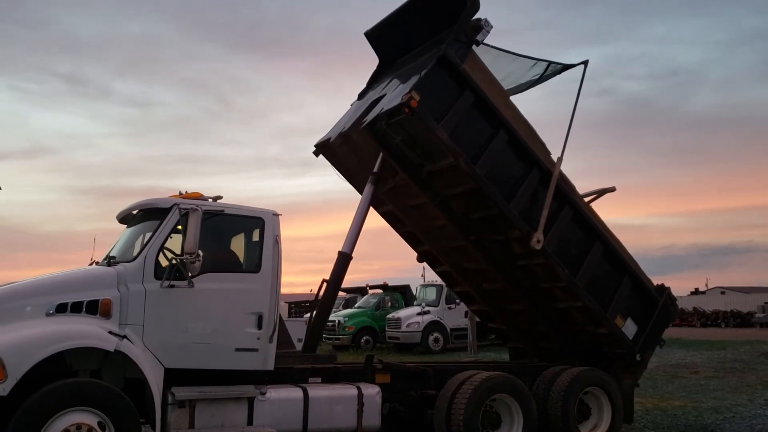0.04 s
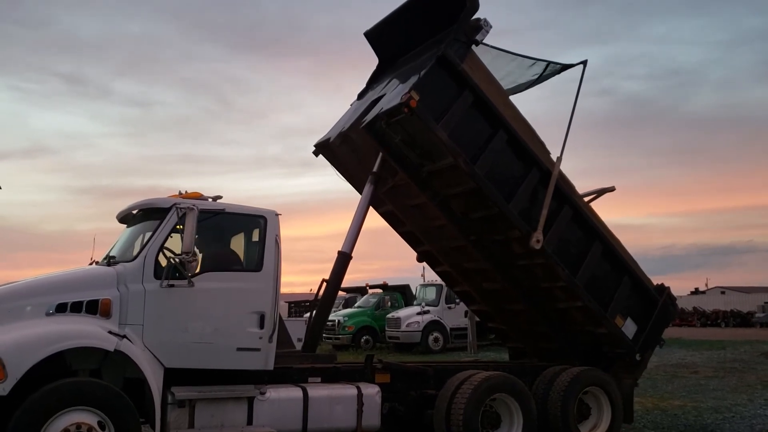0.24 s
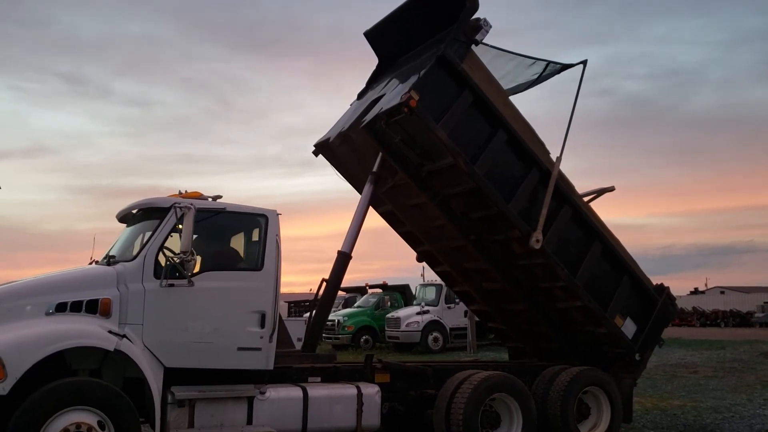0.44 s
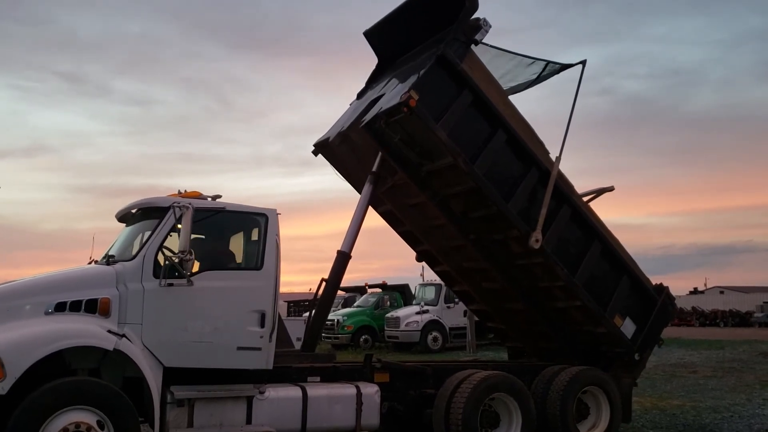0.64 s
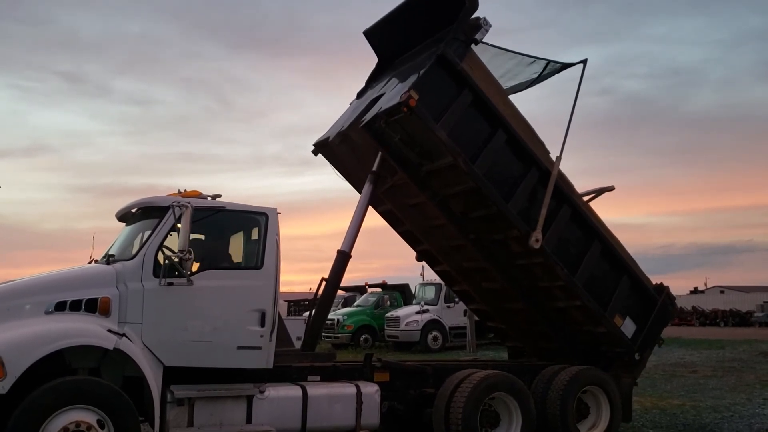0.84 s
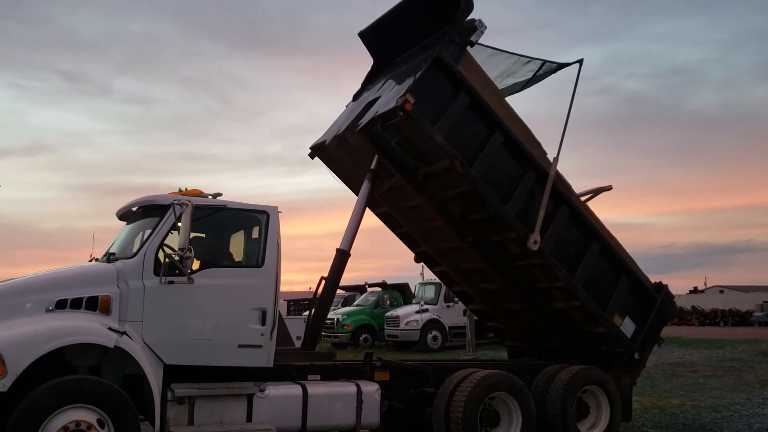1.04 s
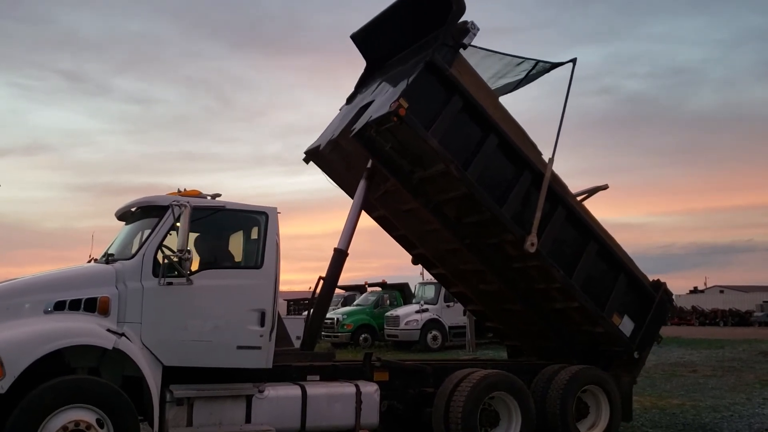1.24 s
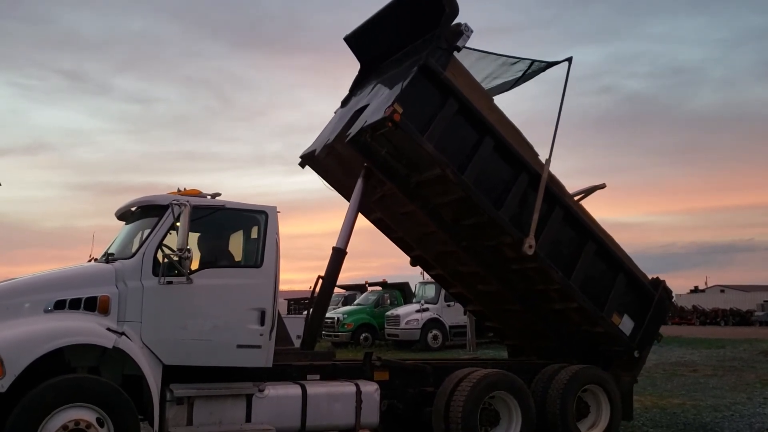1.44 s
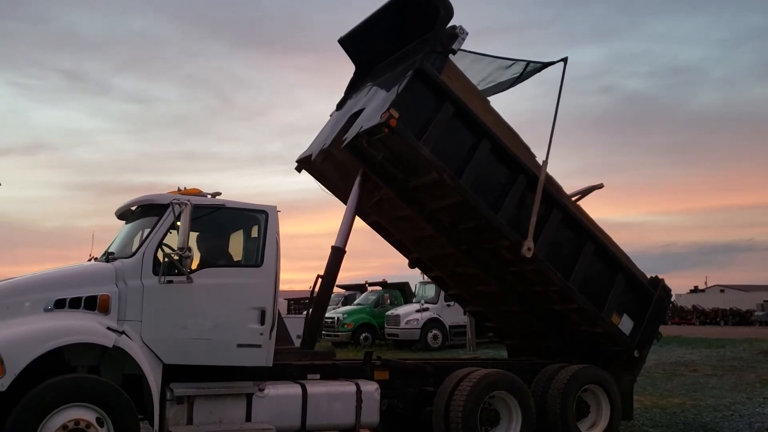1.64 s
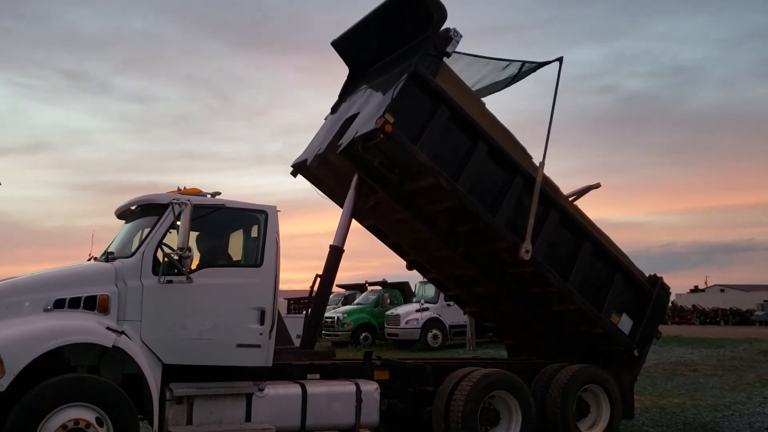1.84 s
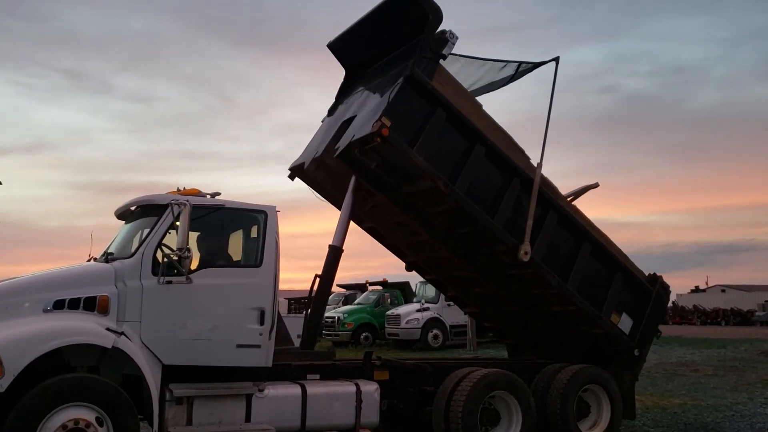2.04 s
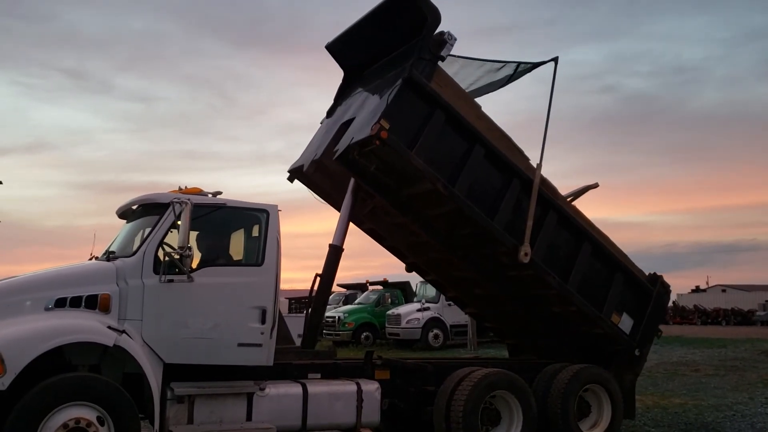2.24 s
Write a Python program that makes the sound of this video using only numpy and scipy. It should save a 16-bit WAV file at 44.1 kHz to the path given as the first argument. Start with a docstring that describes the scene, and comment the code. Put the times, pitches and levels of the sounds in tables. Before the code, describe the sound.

A diesel dump truck idles with a clattering rumble, then its steel bed thumps three times.

```python
"""A six-cylinder diesel dump truck idles outdoors, a few metres away, heard in stereo.
Its exhaust drones and puffs, burning fuel makes the engine clatter, and the fuel injection ticks.
The raised steel bed thumps three times among lighter knocks, with a dull echo from the yard.
An automatic volume control turns the loud moments down quickly and comes back up slowly."""
import sys
import numpy as np
from scipy import signal
from scipy.fft import rfft, irfft, next_fast_len
from scipy.io import wavfile
from scipy.ndimage import uniform_filter1d

SR = 44100
rng = np.random.default_rng(int(sys.argv[2]) if len(sys.argv) > 2 else 0)


def store_wav(level_fs):
    """Save 16-bit WAV to argv[1]."""
    pcm = np.round(np.clip(np.atleast_2d(level_fs), -1, 1) * 32767)
    wavfile.write(sys.argv[1], SR, pcm.T.astype(np.int16))


N = 101429
T, HZ = np.arange(N) / SR, np.fft.rfftfreq(N, 1 / SR)
CRANK_HZ = 11.667  # turns of the engine's crankshaft per second
WAVER_HZ = 34.86  # how fast the ringing steel wavers

# When cylinders fire in one crank turn: (position [share of a turn], relative strength [dB])
FIRINGS = [(.27, -3.5), (.6, -2.5), (.94, -4)]
# How the engine reaches the left and right microphones:
# (frequency [Hz], likeness [0-1], left lead [rad], left minus right [dB])
ENGINE_STEREO = [(60, 0.77, 1.5, -7), (134, 0.83, 1, 1), (287, 0.81, 0.2, 1), (664, 0.94, 1, 1.3),
                 (1290, 0.29, 1.81, 0.5), (2200, 0.44, 1.42, 2.5), (2870, 0.51, 2.5, 3),
                 (4070, 0.52, 2.5, 2.5), (9000, 0, 3, 1.5), (15000, 0, 6.5, 2)]
# The same for the bed: (frequency [Hz], likeness [0-1], left lead [rad], left minus right [dB])
BED_STEREO = [(100, 0.87, 0.5, -1), (248, 0.97, -1.5, 1), (690, 1, -0.5, 2.5), (1370, 0.72, 0.62, 2.5),
              (2800, 0.15, -3.5, 4.5), (10000, 0.1, 0.5, -4)]


def exhaust():
    """The exhaust drones at six times the crank rate, over a rumble that puffs with each firing."""
    # Loudness of the drone: (time [s], level [dB])
    drone_levels = [(0.0, -64), (0.17, -44), (0.25, -30), (0.32, -46), (0.38, -30), (0.42, -41),
                    (0.46, -32), (0.62, -33), (0.66, -61), (0.76, -29), (0.89, -55), (0.95, -34),
                    (1.02, -28.5), (1.08, -40), (1.13, -31.5), (1.28, -33.5), (1.31, -44), (1.43, -28.5),
                    (1.56, -60), (1.6, -31.5), (1.64, -52), (1.71, -48), (1.765, -27), (1.81, -36),
                    (2.0, -35), (2.08, -50), (2.18, -36), (2.22, -30), (2.26, -58)]
    # Weaker exhaust tones: (pitch [multiple of the crank rate], level [dB])
    weak_tones = [(5, -43.5), (10, -45.5), (12, -49)]
    # Tone colour of the rumble: (frequency [Hz], relative level [dB])
    rumble_colour = [(20, -34), (38, 4), (54, -5), (70, 0), (92, 1.5), (125, -0.5), (180, -4), (260, -12.5),
                     (400, -15), (900, -53)]
    # Loudness of the rumble: (time [s], level [dB])
    rumble_levels = [(0, -41.5), (.15, -39), (.27, -31.5), (.45, -38), (.62, -36), (.85, -42), (1.02, -36),
                     (1.3, -35.5), (1.45, -30.5), (1.56, -37), (2.0, -30), (2.3, -40.5)]
    angle = 2 * np.pi * np.cumsum(CRANK_HZ * (1 + 0.0016 * drift(rate_hz=1.2))) / SR
    drone = level(drone_levels) * np.sin(6 * angle + 2 * np.pi * rng.random())
    drone += sum(amp(db) * np.sin(k * angle + 2 * np.pi * rng.random()) for k, db in weak_tones)
    puffs = pulsed(strokes(FIRINGS, decay_s=0.016, spread_db=3.5), share=0.81)
    rumble = level(rumble_levels) * puffs * noise(amp(read(rumble_colour)), ENGINE_STEREO)
    return np.sqrt(2) * drone * amp([[-.5], [.5]]) + rumble


def engine_clatter():
    """Each firing shakes the engine block, which clatters and whines at a few pitches."""
    # Tone colour of the clatter: (frequency [Hz], relative level [dB])
    colour = [(150, -9.5), (320, -4.5), (480, -5.5), (600, -3), (690, -2), (920, -1.5), (1200, -5),
              (1750, -7.5), (2400, -13.5), (3000, -15.5), (4000, -15.5), (5200, -24), (8500, -39.5),
              (16000, -43.5)]
    # Loudness of the clatter: (time [s], level [dB])
    levels = [(0, -31.5), (.3, -31.5), (1.02, -32.5), (1.3, -33.5), (1.6, -32.5), (2.3, -32)]
    # Boost or cut of the clatter around 1670 Hz: (time [s], gain [dB])
    upper_gain = [(0, -1.5), (.45, 0), (.65, -0.5), (1.1, 2.5), (1.4, 0.5), (1.9, -0.5), (2.3, -2.5)]
    # Pitches at which the engine rings: (frequency [Hz], width [Hz], level [dB])
    resonances = [(572, 15, -46.5), (807, 27, -48), (898, 27, -48.5), (1006, 25, -50.5), (2338, 40, -54.5)]
    knocks = pulsed(strokes(FIRINGS, decay_s=0.013, spread_db=2.5), share=0.14)
    grain = unit(amp(drift(rate_hz=200)))
    casing = panel_flicker(noise(amp(read(colour)), ENGINE_STEREO))
    upper = irfft(rfft(casing) * np.exp(-((HZ - 1670) / 1350) ** 2), N)
    clatter = level(levels) * knocks * grain * (casing + (level(upper_gain) - 1) * upper)
    whines = sum(amp(db) * noise(1 / (1 + ((HZ - hz) / width) ** 2), ENGINE_STEREO)
                 for hz, width, db in resonances)
    return clatter + whines


def panel_flicker(sound, flicker_db=2.8, top_hz=5000):
    """Covers and panels ring out by turns, each briefly and in its own narrow range of pitch."""
    hz, _, spectra = signal.stft(sound, SR, nperseg=1024, noverlap=768)
    patches = uniform_filter1d(rng.standard_normal(spectra.shape[1:]), size=3, axis=0)
    patches = unit(uniform_filter1d(patches, size=5, axis=1))
    depth_db = flicker_db / (1 + (hz[:, None] / top_hz) ** 2)
    _, flickering = signal.istft(spectra * amp(depth_db * patches), nperseg=1024, noverlap=768)
    return unit(flickering[:, :N])


def injection():
    """The fuel injection ticks and fizzes three times a turn; now and then a tick is much harder."""
    # Ticks in one crank turn: (position [share of a turn], relative strength [dB])
    pattern = [(.24, 1), (.32, 10), (.62, 0)]
    # The hardest ticks: (time [s], level [dB])
    hard_ticks = [(.275, -41.5), (.363, -39), (.446, -39), (.620, -44), (.704, -43), (.878, -54),
                  (1.046, -43), (1.304, -42), (1.474, -43.5), (1.981, -31.5)]
    # Metallic tone colour of a tick: (frequency [Hz], relative level [dB])
    tick_colour = [(1200, -26), (2800, -16), (3600, 2), (4250, 11.5), (4900, -7), (7000, -23),
                   (9000, -41.5), (15000, -55)]
    # Tone colour of the high fizz: (frequency [Hz], relative level [dB])
    fizz_colour = [(7000, -23), (9500, 1), (10600, 6.5), (11300, 1), (12200, 6), (13300, -6), (16000, -18)]
    regular = amp(-57.5) * strokes(pattern, decay_s=0.003, spread_db=0.5)
    hard = sum(amp(db) * blow(start, rise=0.0096, fade=0.055) for start, db in hard_ticks)
    ticks = np.hypot(regular, hard) * noise(amp(read(tick_colour)), ENGINE_STEREO)
    spurts = strokes([(0.14 + k / 3, 0) for k in range(3)], decay_s=0.017, spread_db=4.0)
    return ticks + amp(-64.5) * spurts * noise(amp(read(fizz_colour)), ENGINE_STEREO)


def truck_bed():
    """The steel bed thumps three times and knocks lightly as it shifts and settles."""
    # Heavy thumps: (time [s], rise [s], boom pitch [Hz], boom level [dB], boom fade [s], thud [dB],
    # ring [dB], crash [dB], crash fade [s], crash cutoff [Hz], rattle [dB], rattle cutoff [Hz],
    # clang pitch [Hz], clang boost [dB])
    thumps = [(1.655, 0.012, 221.5, -12, 0.15, -31, -22.5, -19, 0.24, 2480, -29.5, 6300, 422, 2),
              (1.806, 0.015, 214.7, -19.5, 0.29, -26, -26.5, -18, 0.27, 1650, -26, 4100, 386, 11.5),
              (1.944, 0.0096, 262.1, -7, 0.039, -18, -27, -14.5, 0.18, 2420, -34.5, 3800, 935, 3)]
    # Light knocks: (time [s], panel pitch [Hz], knock level [dB], rattle level [dB])
    knocks = [(1.502, 130, -33, -62), (1.585, 190, -26.5, -51), (1.644, 388.4, -23.5, -37),
              (1.715, 298, -21.5, -66), (1.755, 115, -19.5, -52), (1.981, 116, -19, -38),
              (2.021, 760, -30, -50), (2.05, 257.7, -33, -60), (2.087, 229, -29, -60)]
    return sum(thump(*row) for row in thumps) + sum(light_knock(*row) for row in knocks)


def thump(start, rise, boom_hz, boom_db, boom_fade, thud_db, ring_db, crash_db, crash_fade,
          crash_cutoff_hz, rattle_db, rattle_cutoff_hz, clang_hz, clang_db):
    """The steel crashes and rings, a big panel booms, fittings rattle and the hollow bed rumbles."""
    # The bed's own ringing tones: (frequency [Hz], relative level [dB], fade [s])
    bed_tones = [(124.4, -14, 0.5), (170.2, -1.5, 0.52), (260.8, -3, 0.58), (289.4, -4, 0.7),
                 (342.5, -4.5, 0.76), (390.4, -2, 0.28), (432.7, -2, 0.29), (616, -6, 0.39),
                 (704.6, -5, 0.42), (797, -8, 0.28), (864, -8.5, 0.17), (1084, -6.5, 0.12)]
    # Tone colour of the crashing steel: (frequency [Hz], relative level [dB])
    crash_colour = [(50, -6), (100, 2.5), (250, -8.5), (400, -4.5), (520, -5.5), (800, -1.5), (1000, -9),
                    (1400, -7.5), (2000, -15), (2800, -26), (5500, -36), (9000, -50)]
    # Tone colour of the hollow rumble: (frequency [Hz], relative level [dB])
    hollow_colour = [(100, -19), (190, 6), (270, 12), (380, 3), (480, 9.5), (750, 3), (1300, -25),
                     (5000, -77)]
    # The big panel starts to move just after the hit.
    boom = amp(boom_db) * blow(start + 1.22 * rise, 1.31 * rise, boom_fade) * steel_tone(boom_hz)
    thud = amp(thud_db) * blow(start, rise, fade=0.15) * steel_tone(hz=112.9)
    ring = sum(amp(ring_db + db) * blow(start, rise, fade) * steel_tone(hz)
               * unit(amp(4 * drift(WAVER_HZ))) for hz, db, fade in bed_tones)
    # Each point of contact brings out its own range of pitch.
    clang = clang_db * np.exp(-(np.log2((HZ + 1) / clang_hz) / 0.3) ** 2)
    colour = amp(read(crash_colour) + clang) / np.sqrt(1 + (HZ / crash_cutoff_hz) ** 4)
    steel = noise(colour, BED_STEREO)
    low = irfft(rfft(steel) / (1 + (HZ / 1000) ** 4), N)
    treble = steel - low
    crash = amp(crash_db) * (low * blow(start, rise, crash_fade) + treble * blow(start, rise, fade=0.28))
    hollow = amp(-22.5) * blow(start, rise=0.038, fade=0.34) * noise(amp(read(hollow_colour)), BED_STEREO)
    return boom + thud + ring + crash + hollow + rattle(start, rise * 0.74, rattle_db, rattle_cutoff_hz)


def steel_tone(hz, wobble=0.02486):
    """One ringing tone of the bed, in stereo; the rattling steel bends its pitch a little."""
    sides = np.array([[0.5], [-0.5]])
    phase_gap = np.arccos(np.clip(read(BED_STEREO, hz), 0, 1))
    phase = 2 * np.pi * rng.random() + sides * rng.choice([-1, 1]) * phase_gap
    cycles = np.cumsum(hz * (1 + wobble * drift(WAVER_HZ))) / SR
    return np.sqrt(2) * amp(sides * read(BED_STEREO, hz, column=3)) * np.sin(2 * np.pi * cycles + phase)


def light_knock(start, panel_hz, knock_db, rattle_db, rise=0.0075):
    """One panel rings briefly over a dull thud, and the fittings clink."""
    # Tone colour of the thud: (frequency [Hz], relative level [dB])
    thud_colour = [(40, -24), (100, 0), (280, 1), (450, -10), (800, -28), (2000, -51)]
    body = steel_tone(panel_hz) + amp(-3) * noise(amp(read(thud_colour)), BED_STEREO)
    knock = amp(knock_db) * blow(start, rise, fade=0.07) * body
    return knock + rattle(start, rise, rattle_db, cutoff_hz=3800)


def rattle(start, rise, db, cutoff_hz):
    """Loose fittings on the bed chatter briefly."""
    # Tone colour of the fittings: (frequency [Hz], relative level [dB])
    colour = [(800, -24), (2200, 8.5), (3000, -5), (4100, 1.5), (6000, -8.5), (9000, -17), (15000, -11)]
    softened = amp(read(colour)) / np.sqrt(1 + (HZ / cutoff_hz) ** 4)
    return amp(db) * blow(start, rise, fade=0.15) * noise(softened, BED_STEREO)


def yard_echo(sound, cutoff_hz=600):
    """The yard scatters the sound back as a dull, weak echo."""
    tail = irfft(rfft(rng.standard_normal((2, N))) / (1 + (HZ / cutoff_hz) ** 2), N)
    tail *= blow(start=0.011, rise=0.01, fade=0.7)
    tail /= np.sqrt(np.mean(abs(rfft(tail))[:, HZ < cutoff_hz] ** 2))
    return amp(-13) * signal.fftconvolve(sound, tail, axes=1)[:, :N]


def air_hiss():
    """Air hisses steadily around the engine."""
    # Tone colour of the hiss: (frequency [Hz], relative level [dB])
    colour = [(2000, -14), (7000, 7.5), (9000, -3), (13000, 5), (16000, -13)]
    return amp(-60) * noise(amp(read(colour)), ENGINE_STEREO)


def amp(db):
    """Turns decibels into a number to multiply by."""
    return 10 ** (np.asarray(db) / 20)


def unit(x):
    """Scales a signal to an average strength (rms) of 1."""
    return x / np.sqrt(np.mean(x ** 2) + 1e-20)


def read(table, hz=HZ, column=1):
    """Looks up a table by frequency, blending between rows on a log scale."""
    table = np.array(table, float)
    return np.interp(np.log(hz + 1), np.log(table[:, 0] + 1), table[:, column])


def level(curve):
    """A volume that runs straight between points of (time [s], level [dB])."""
    times, db = np.transpose(curve)
    return np.interp(T, times, amp(db))


def drift(rate_hz):
    """A smooth random wander; a higher rate makes it quicker."""
    size = next_fast_len(N)
    hz = np.fft.rfftfreq(size, 1 / SR)
    return unit(irfft(rfft(rng.standard_normal(size)) * np.exp(-(hz / rate_hz) ** 2), size)[:N])


def noise(colour, stereo):
    """Noise of a given tone colour, as the two microphones hear it."""
    left, other = rfft(rng.standard_normal((2, N)))
    likeness = np.clip(read(stereo), 0, 1)
    balance = amp(read(stereo, column=3) / 2)
    right = (likeness * left + np.sqrt(1 - likeness ** 2) * other) * np.exp(-1j * read(stereo, column=2))
    return unit(irfft(np.array([left * balance, right / balance]) * colour, N))


def strokes(pattern, decay_s, spread_db):
    """The loudness shape of uneven blows that repeat with every crank turn."""
    power = np.zeros(N)
    rise_s = 0.34 * decay_s
    for turn in np.arange(-1, T[-1] * CRANK_HZ):
        for share, db in pattern:
            age = T - (turn + share) / CRANK_HZ
            live = (age > 0) & (age < 10 * decay_s)
            shape = np.exp(-age[live] / decay_s) * (1 - np.exp(-age[live] / rise_s))
            power[live] += (amp(db + spread_db * rng.standard_normal()) * shape) ** 2
    return unit(np.sqrt(power))


def pulsed(pulses, share):
    """Blends a steady level (share 0) with a pulsing one (share 1)."""
    return np.sqrt(1 - share + share * pulses ** 2)


def blow(start, rise, fade):
    """The loudness shape of one hit: it swells for `rise` seconds, then drops 60 dB in `fade` seconds."""
    age = T - start
    swell = np.sin(np.pi / 2 * np.clip(age / rise, 0, 1)) ** 2
    return swell * np.exp(-np.log(1000) * np.maximum(age - rise, 0) / fade)


def scene():
    """The idling engine, and the thumping bed with its echo."""
    hiss = air_hiss()
    bed = truck_bed()
    return exhaust() + engine_clatter() + injection() + hiss + bed + yard_echo(bed)


def record(dry, threshold_db=-21, squeeze=0.34):
    """The volume control ducks quickly and recovers slowly; then the highest treble is cut off."""
    power_db = 10 * np.log10(abs(uniform_filter1d((dry ** 2).mean(0), size=440)) + 1e-12)
    fall_db = 7 * T  # the remembered peak sinks by 7 dB a second
    peak_db = np.maximum.accumulate(power_db + fall_db) - fall_db
    over_db = np.maximum(peak_db - threshold_db, 0)
    ducked = dry / amp(squeeze * uniform_filter1d(over_db, size=300))
    treble_cut = signal.firwin(1023, cutoff=15780, window=("kaiser", 10), fs=SR)
    return signal.oaconvolve(ducked, treble_cut[None], "same")


dry = scene()
out = record(dry)
store_wav(out)
```